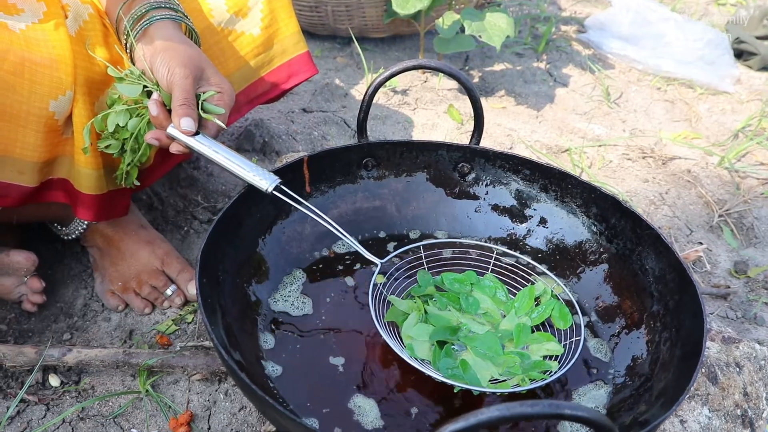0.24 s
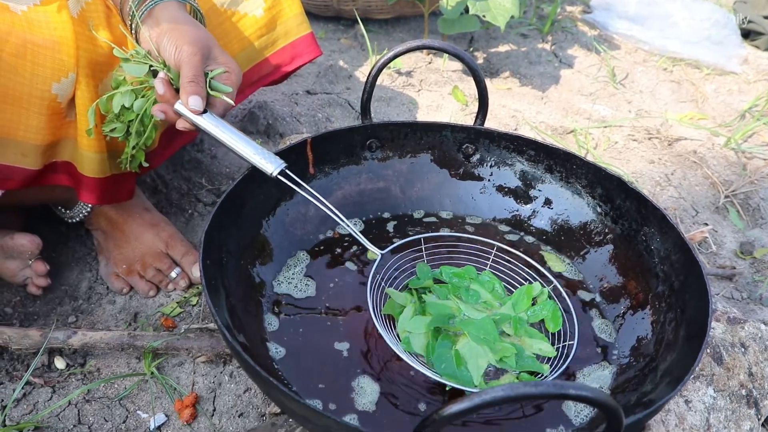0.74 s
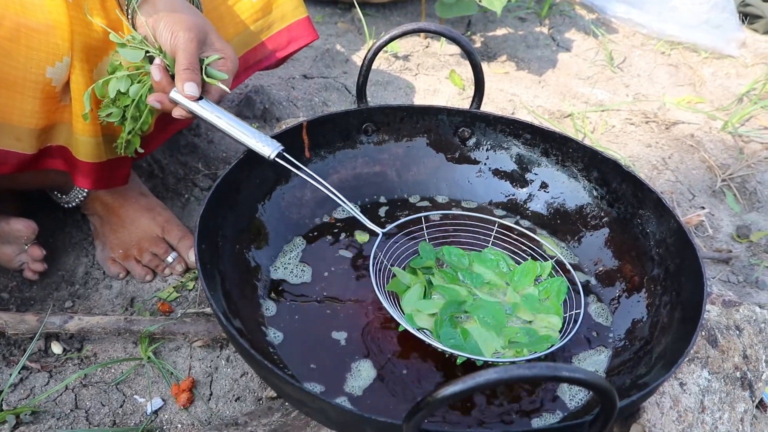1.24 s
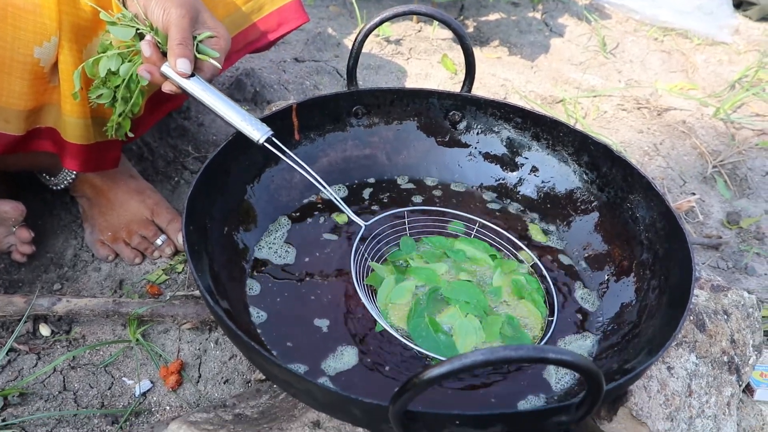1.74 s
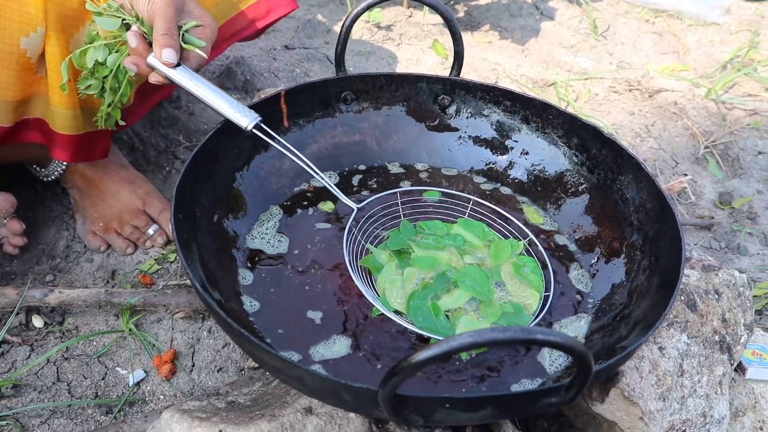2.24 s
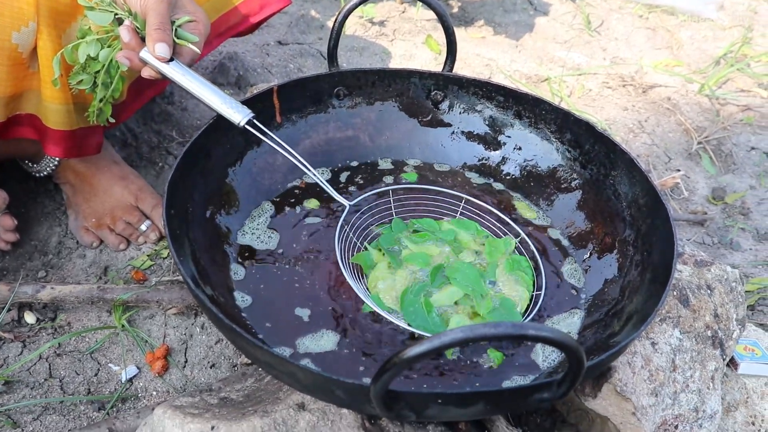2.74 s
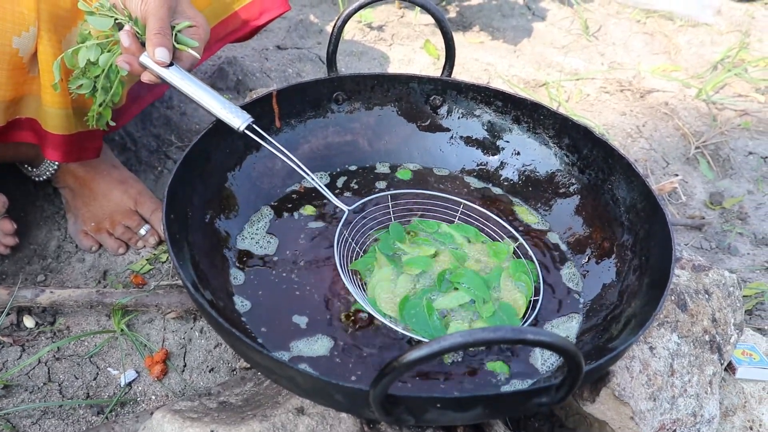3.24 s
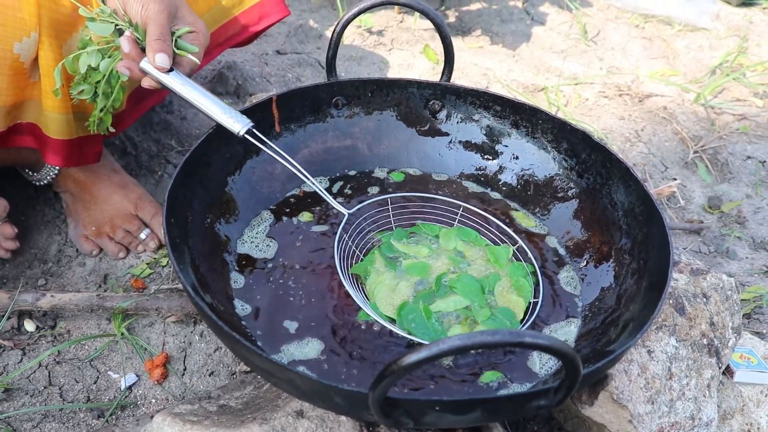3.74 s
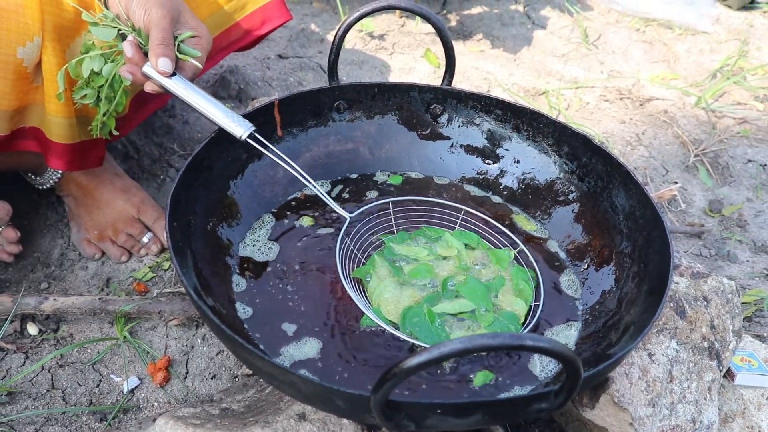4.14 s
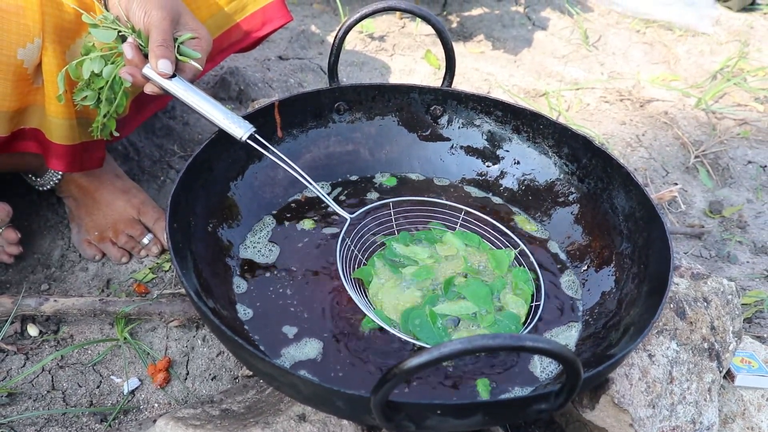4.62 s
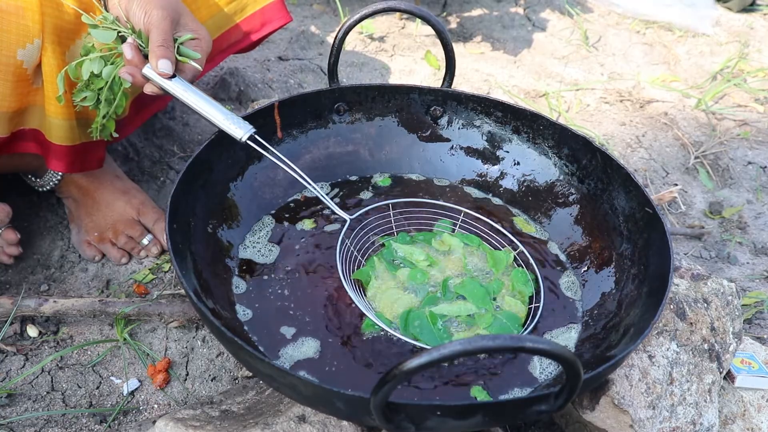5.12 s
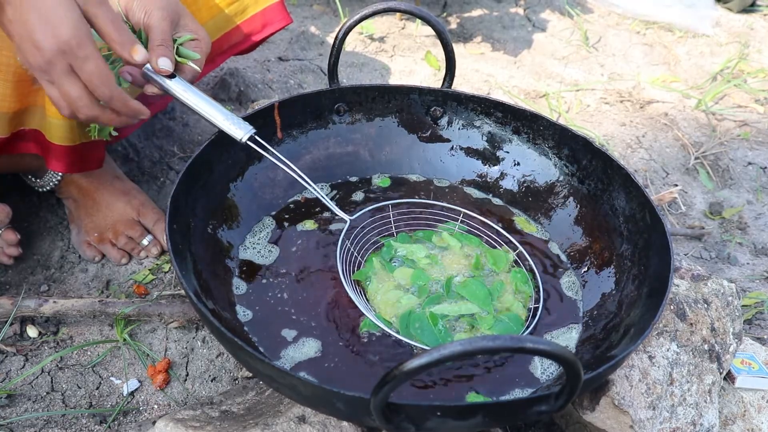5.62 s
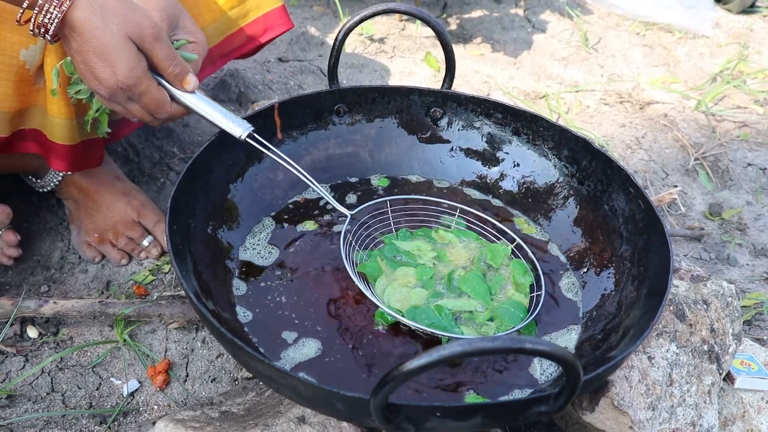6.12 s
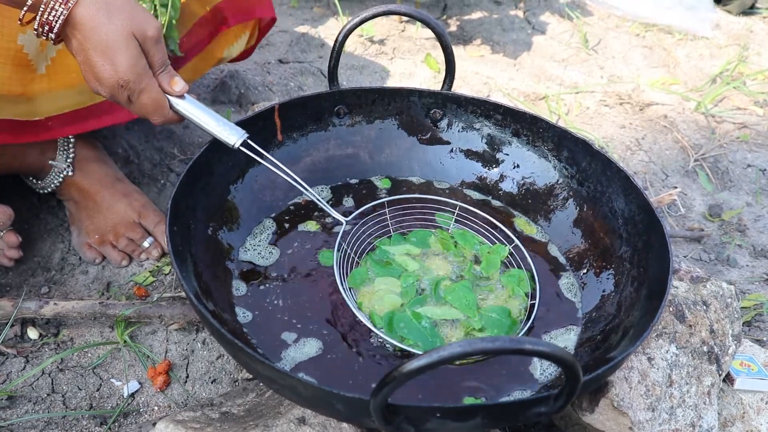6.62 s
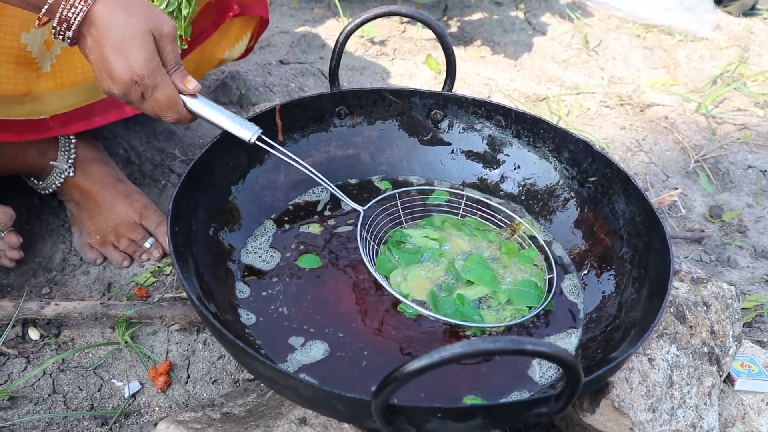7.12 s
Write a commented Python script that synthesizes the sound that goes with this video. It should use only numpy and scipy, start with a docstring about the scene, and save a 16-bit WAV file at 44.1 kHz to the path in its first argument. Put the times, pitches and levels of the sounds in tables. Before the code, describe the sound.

Fresh wet leaves fry in hot oil in a wide iron pan, close to a stereo microphone outdoors. Sharp, loud pops come scattered at first, then after about a second crowd into a dense crackle over a fine fizz, easing slightly later on. Cicadas hiss faintly in the distance above a low rumble, and a few soft wind puffs brush the right side early on.

```python
"""Wet leaves fry in hot oil in a wide iron pan, outdoors, close to a stereo pair of microphones.
Steam pockets burst one by one, echo off the pan wall and ring the air in its bowl, over a fine fizz.
Cicadas hiss in the distance; wind brushes mostly the right microphone, above a low outdoor rumble.
A limiter ducks everything after each loud pop."""
import sys
import numpy as np
from scipy import signal
from scipy.fft import rfft, irfft
from scipy.io import wavfile
from scipy.ndimage import uniform_filter1d, minimum_filter1d

SR = 44100
rng = np.random.default_rng(int(sys.argv[2]) if len(sys.argv) > 2 else 0)


def wrap_up_sound(samples):
    """Save the sound to the file named by the first command line argument, as 16-bit audio."""
    columns = np.atleast_2d(samples).T
    # keep every value between -1 and 1, then stretch to whole-number steps
    tamed = np.clip(columns, -1, 1)
    steps = np.round(tamed * 32767).astype(np.int16)
    wavfile.write(sys.argv[1], SR, steps)


N = 325017
TIME_S = np.arange(N) / SR

# Loud pops, close up. Each row: start in seconds, peak in dB before the limiter, nominal pitch in Hz.
POPS = [(0.03, 10, 3200), (0.046, -14.5, 1930), (0.0645, 15.5, 1930), (0.1956, -2, 3750), (0.269, 13, 2630),
        (0.2893, 8, 3130), (0.442, -13, 3200), (0.4856, 6.5, 3740), (0.5278, 12.5, 2150),
        (0.7645, 10.5, 2200), (0.7948, -9, 1820), (0.948, 19.5, 2880), (0.9525, 16, 2050),
        (0.9583, 18.5, 2080), (0.9916, 11.5, 2550), (1.0207, 10.5, 2153), (1.1048, 9.5, 1656),
        (1.127, 12.5, 2760), (1.1507, 14.5, 1730), (1.1621, 9.5, 2220), (1.196, 13.5, 2370),
        (1.2723, 9, 3300), (1.283, -1, 3180), (1.2897, 17, 2780), (1.4008, 8.5, 1565), (1.4142, 8, 2620),
        (1.4278, 18, 1830), (1.4565, 8.5, 2030), (1.4747, 11.5, 1070), (1.5231, 17, 3800),
        (1.5408, 19.5, 2100), (1.5797, 12, 1650), (1.5996, 15.5, 2410), (1.6358, 6, 3620),
        (1.643, 10.5, 1900), (1.6564, 16.5, 1320), (1.6632, 11, 1540), (1.7257, 18.5, 2730),
        (1.7521, 13.5, 1660), (1.8051, 11, 2530), (1.8452, 6, 1570), (1.8554, 10, 2440),
        (1.8649, 14.5, 2870), (1.8773, 12.5, 3120), (1.914, 6, 1160), (1.932, 1, 2480),
        (1.9388, 17.5, 2490), (1.9759, 26, 1600), (1.978, 17.5, 2200), (2.0021, 19.5, 2270),
        (2.007, 16, 3940), (2.0736, 20.5, 2600), (2.083, 16, 3320), (2.098, 16.5, 2440), (2.1367, 15, 2010),
        (2.1555, 10, 2680), (2.1645, 8.5, 3060), (2.1966, 25, 3040), (2.2385, 19, 3020), (2.2451, 14, 1550),
        (2.259, 13, 3080), (2.2837, 7, 2880), (2.2862, 19.5, 2530), (2.3387, 15.5, 2610), (2.357, 10, 3500),
        (2.3656, 8, 2880), (2.372, 23.5, 3120), (2.4056, 21.5, 3900), (2.458, 18.5, 2890),
        (2.481, 12, 1930), (2.5254, 9, 3300), (2.554, 14, 3130), (2.5706, 14.5, 3250), (2.5792, 10, 2220),
        (2.6181, 16, 3230), (2.6389, 8.5, 3480), (2.6567, 27.5, 2430), (2.691, 19, 2990),
        (2.7054, 10, 2500), (2.7506, 18.5, 2570), (2.7561, 14, 3260), (2.7732, 14, 2050), (2.7841, 9, 2600),
        (2.8017, 22, 3170), (2.83, 16.5, 2870), (2.8922, 22.5, 2680), (2.9187, 10, 2470), (2.9744, 3, 2530),
        (3.0188, 7, 2004), (3.0232, 3, 2770), (3.0443, 10, 2500), (3.0604, 16, 2200), (3.0776, 14, 3080),
        (3.0926, 18.5, 2120), (3.1665, 10, 2690), (3.1734, 19, 2980), (3.1951, 17.5, 3070),
        (3.2722, 18, 2100), (3.2781, 11, 1450), (3.2837, 16, 3380), (3.3028, 11, 2500),
        (3.3235, 20.5, 2350), (3.3278, 19, 2840), (3.3337, 3, 2780), (3.3659, 21, 2060), (3.3791, 16, 3120),
        (3.4162, 8, 2500), (3.4298, 19, 2140), (3.4446, 12.5, 2030), (3.5181, 7, 3070), (3.5239, 8, 2300),
        (3.5347, 15, 3140), (3.5412, 14, 2580), (3.572, 19, 2500), (3.5864, 17, 3250), (3.6362, 23, 2480),
        (3.6923, 12.5, 1900), (3.6961, 10, 4200), (3.7171, 10.5, 2110), (3.7384, 12.5, 3320),
        (3.76, 15, 2220), (3.7884, 10.5, 2100), (3.8175, 18.5, 2770), (3.842, 14.5, 3500),
        (3.872, 9.5, 2520), (3.901, 21.5, 3140), (3.9131, 14, 2720), (3.922, 12.5, 2700),
        (4.0226, 14.2, 2610), (4.0249, 17, 2470), (4.0497, 16, 2520), (4.067, 13.5, 2940),
        (4.091, 15.5, 2970), (4.1237, 5, 2800), (4.1415, 13, 2160), (4.172, 4.5, 3400), (4.1962, 4.5, 2780),
        (4.2668, 0.5, 3040), (4.2996, 5, 2850), (4.3079, 12, 2510), (4.3314, 6, 2200), (4.353, 15, 2970),
        (4.3632, 13.5, 1700), (4.4029, 15.5, 3650), (4.412, 8.5, 3080), (4.508, 14.5, 2770),
        (4.5227, 11.5, 2260), (4.542, 4.5, 3900), (4.5814, 13, 3510), (4.6116, -1, 3520), (4.6239, 7, 3080),
        (4.6376, 1.5, 3060), (4.6446, 18.5, 2820), (4.6611, 12.5, 3230), (4.7189, 18.5, 2280),
        (4.7451, 11.5, 3000), (4.8022, 12, 2750), (4.81, 20.5, 3470), (4.8233, 19, 4100),
        (4.898, 13.5, 3500), (4.928, 7, 1610), (4.967, 8, 2730), (4.9755, 15, 1970), (5.0758, 11, 1760),
        (5.1999, 7, 1830), (5.2668, 0.5, 2880), (5.298, 5, 3160), (5.3112, 9.5, 1500), (5.312, 14, 1900),
        (5.3687, 15, 2560), (5.3915, 10.8, 1710), (5.431, 5, 2960), (5.46, 7, 2570), (5.4776, 10, 2050),
        (5.5417, 16, 2870), (5.5651, 9.5, 2100), (5.5754, 7, 3650), (5.6323, 11, 3020), (5.6506, 1.5, 2600),
        (5.675, 15, 3300), (5.6954, 6.5, 3100), (5.7379, 17, 2080), (5.7761, 6.5, 1540), (5.7843, 12, 2620),
        (5.8074, 8.5, 3000), (5.837, 2.5, 3030), (5.8857, 8.5, 3470), (5.9277, 2, 1660), (5.9444, 8, 3200),
        (6.015, 4, 3760), (6.0256, 18.5, 3030), (6.0368, 13.5, 3100), (6.0723, 10, 1820),
        (6.1189, 4.5, 2730), (6.1341, 13, 3020), (6.16, 8.5, 3460), (6.2492, 6.5, 3860), (6.2904, 10, 2680),
        (6.3119, 16.5, 3860), (6.3441, 15, 2660), (6.4811, 8.5, 2580), (6.485, 5.5, 1870),
        (6.5079, 11.5, 2800), (6.551, 2, 1200), (6.588, 10.5, 3250), (6.6534, 7.5, 2950),
        (6.6922, 10.5, 3750), (6.7333, 7.5, 2320), (6.76, 6.5, 1550), (6.7626, 3.5, 2360),
        (6.7846, 6.5, 1540), (6.806, 9, 3540), (6.8352, 2, 2700), (6.8649, 12.5, 2900), (6.937, 9, 1730),
        (6.9433, 14, 3040), (6.972, 15, 2010), (6.976, 8, 3070), (6.994, 9, 1620), (7.0357, 9, 3900),
        (7.1064, 11, 2900), (7.14, 16.5, 1700), (7.145, 16, 3200), (7.1847, 10, 1544), (7.23, 1, 1010),
        (7.2747, 2, 1900), (7.2952, 4, 3170), (7.2976, 15.5, 2450), (7.3518, 20, 1890), (7.3655, 12, 2780),
        (7.3686, 15.5, 2500)]
def pops():
    """Big steam pockets burst, pitched by their size; some throw droplets that burst again just after."""
    start_s, peak_db, hz = np.transpose(POPS)
    count = len(start_s)
    throws = rng.random(count) < 0.4
    droplet_s = np.minimum(start_s + 0.001184 + 0.0041 * rng.random(count), N / SR - .001)
    droplet_db = peak_db - rng.uniform(2, 10, count)
    droplet_hz = hz * rng.uniform(0.67, 2.37, count)
    droplets = steam_bursts(droplet_s[throws], droplet_db[throws], droplet_hz[throws], tear_db=18)
    return steam_bursts(start_s, peak_db, hz, tear_db=24.2) + droplets


# Sputter in the same pan. Each row: time in seconds, base rate in bursts per second, highest peak in dB.
SPUTTER = [(0, 55, -11), (.9, 55, -16.5), (1.1, 60, -4.5), (1.9, 217, 6), (4.6, 200, 1.5), (5.2, 130, -3.5)]
def sputter(candidates=2100, stray_share=0.5, stir_s=.025, lull_s=0.013):
    """Small pockets burst at random, crowd in after each loud pop and pause just before one."""
    times, rates, tops_db = np.transpose(SPUTTER)
    start_s = rng.uniform(0, N / SR, candidates)
    after_pop_s = start_s[:, None] - np.transpose(POPS)[0]
    since_last_s = np.where(after_pop_s > 0, after_pop_s, np.inf).min(1)
    rate = np.interp(start_s, times, rates) * (stray_share + np.exp(-since_last_s / stir_s))
    in_lull = ((after_pop_s < 0) & (after_pop_s > -lull_s)).any(1)
    start_s = start_s[(rng.random(candidates) < rate * N / SR / candidates) & ~in_lull]
    peak_db = np.interp(start_s, times, tops_db) - 24 * rng.random(len(start_s)) ** 1.94
    hz = 2000 * 2.67 ** rng.random(len(start_s))
    return steam_bursts(start_s, peak_db, hz, tear_db=8.1)


# Colour of a burst leaving the bowl of the pan. Each row: frequency in Hz, relative gain in dB.
PAN_COLOUR = [(100, -23), (380, -9), (500, -2), (760, 0), (1100, -4.5), (1440, 2), (2290, 0.5), (3250, 3),
              (5450, 1.5), (8330, 10.5), (11600, 2.5), (14000, 3), (16500, 5)]
# The pan across the two microphones. Each row: frequency in Hz, left minus right in dB.
PAN_BALANCE = [(300, 1.5), (700, 1.5), (1300, 2.5), (2400, -3.5), (4400, -0.5), (15000, 1.5)]
def steam_bursts(start_s, peak_db, hz, tear_db, size=1024):
    """Each pocket pushes, snaps back and wobbles once or twice; the pan echoes and colours it."""
    count = len(start_s)
    freqs, two_sided_hz = np.fft.rfftfreq(size, 1 / SR), abs(np.fft.fftfreq(size, 1 / SR))
    pitch = hz[:, None]
    cycles = np.arange(size) / SR * pitch * 1.019
    wobble = np.sin(2 * np.pi * cycles) * cycles * np.exp(-cycles / 0.29)
    # the film tears at the end of the push: a step, sharper for small pockets
    tear_gain = (pitch / 3000) ** 2.2 * gain_of(tear_db - 32 * rng.random((count, 1)) ** 0.52)
    tear = (cycles < .45) * cycles * tear_gain
    source = rfft(0.43 * wobble / wobble.max(1, keepdims=True) + tear) * bowl_ring(freqs, pitch)
    pair = []
    for side, echoes in zip((.5, -.5), wall_echoes(freqs, count)):
        arrival = delayed(freqs, .00004 * rng.random((count, 1)))
        colour_db = db_at(PAN_COLOUR, two_sided_hz) + side * db_at(PAN_BALANCE, two_sided_hz)
        pair.append(irfft(source * (1 + echoes) * arrival * rfft(sharp_impulse(colour_db))))
    pair = np.array(pair)[:, :, :size // 2]
    pair *= (gain_of(peak_db) / abs(pair).max((0, 2)))[:, None]
    samples = np.round(start_s * SR).astype(int)[:, None] + np.arange(size // 2)
    out = np.zeros((2, N + size))
    for channel, bursts in zip(out, pair):
        np.add.at(channel, samples, bursts)
    return out[:, :N]


def bowl_ring(freqs, pitch, ring_hz=1440, width_hz=100, reach_hz=130):
    """The air in the bowl of the pan rings, most for pockets near its own pitch."""
    lift = 3 * np.exp(-((pitch - ring_hz) / reach_hz) ** 2)
    return 1 + lift / (1 + 1j * (freqs - ring_hz) / width_hz)


def wall_echoes(freqs, count, dull_hz=6650):
    """The curved, oily wall returns dulled echoes: one shared, eight timed apart at each microphone."""
    shared = 0.21 * delayed(freqs, 0.000549 + 0.00043 * rng.random((count, 1)))
    path_s = 0.00032 + 0.003466 * rng.random((count, 8, 1)) ** 1.356
    polarity = rng.choice([-1, 1], path_s.shape)
    for _ in range(2):
        delay_s = path_s + 0.00013 * rng.random(path_s.shape)
        scattered = (.5 * polarity * np.exp(-delay_s / 0.0019) * delayed(freqs, delay_s)).sum(1)
        yield (shared + scattered) / (1 + 1j * freqs / dull_hz)


# Close fizz and the open air around it. Each row: frequency in Hz, relative density in dB.
FIZZ_SPECTRUM = [(200, -60), (500, -24), (2280, -17.5), (3240, -16.5), (3970, -21.5), (7260, -23.5),
                 (9330, -28.5), (14400, -34.5), (16500, -61)]
def oil_fizz(level_db=-29):
    """The oil's fine fizz blends with the outdoor air and thickens with the sputter."""
    times, rates, _ = np.transpose(SPUTTER)
    level = gain_of(level_db) * np.interp(TIME_S, times, rates / rates.max()) ** 0.33
    return level * stereo_noise(FIZZ_SPECTRUM, coherence=0.64, patchy_db=2.8, flicker_db=2.8, size=256)


# Cicadas, heard from a distance. Each row: frequency in Hz, relative density in dB.
CICADA_SPECTRUM = [(4000, -46), (4400, -10), (4850, 0), (5300, -3.5), (6140, -6), (6600, -12), (7300, -27)]
# Their level at the microphones. Each row: time in seconds, level in dB.
CICADA_LEVELS = [(0.2, -29), (.5, -27), (2, -30), (7.4, -28.5)]
def cicadas():
    """A far chorus merges into one wide hiss that swells and sinks."""
    hiss = stereo_noise(CICADA_SPECTRUM, coherence=0.033, patchy_db=0.92, flicker_db=1, size=512)
    return envelope(CICADA_LEVELS) * hiss


# Turbulence right at the microphones. Each row: frequency in Hz, relative density in dB.
WIND_SPECTRUM = [(25, -45), (76, 1.5), (120, 1), (263, -7.5), (430, -24), (600, -54), (1320, -120)]
# Gusts, mostly on the right microphone. Each row: time of the peak in seconds, relative level in dB.
GUSTS = [(0.388, -12.5), (.47, -32), (.51, -13), (.553, -4.5), (0.753, -5), (0.841, -7), (0.94, -17),
         (1.522, -13.5), (1.71, -18), (4.29, -26), (6.46, -26)]
def wind(breeze_db=-42, rise_db_per_s=307, fall_db_per_s=249, thump_hz=95, thump_s=0.0083):
    """Short puffs of low turbulence ride a weak breeze; each peaks in one push on the capsule."""
    level, thumps = gain_of(breeze_db), 0
    for peak_s, db in GUSTS:
        t = TIME_S - peak_s
        level = level + gain_of(db - np.maximum(-rise_db_per_s * t, fall_db_per_s * t))
        push = np.sin(2 * np.pi * (thump_hz * TIME_S + rng.random()))
        thumps = thumps + gain_of(db) * np.exp(-(t / thump_s) ** 2) * push
    turbulence = stereo_noise(WIND_SPECTRUM, coherence=0, patchy_db=1, flicker_db=4, size=512)
    puffs = np.tanh(2 * (0.89 * level * turbulence + 1.54 * thumps)) / 2  # the capsule overloads softly
    housing = signal.butter(2, 55, "high", fs=SR)
    return signal.lfilter(*housing, puffs) * gain_of([[-22], [0]])


# Outdoor background, all around. Each row: frequency in Hz, relative density in dB.
RUMBLE_SPECTRUM = [(25, -23), (81, 6.5), (102, 2.5), (156, -2), (254, -10.5), (400, -11.5), (520, -22.5),
                   (880, -120)]
# Its level at the microphones. Each row: time in seconds, level in dB.
RUMBLE_LEVELS = [(0, -31), (1.1, -33), (1.9, -35), (2.2, -39), (3, -33.5), (5.6, -36), (7.4, -29.5)]
def rumble():
    """A low rumble swells slowly, nearly alike in both microphones."""
    low = stereo_noise(RUMBLE_SPECTRUM, coherence=0.94, patchy_db=1, flicker_db=1, size=2048)
    return envelope(RUMBLE_LEVELS) * low


def stereo_noise(spectrum, coherence, patchy_db, flicker_db, size):
    """Shaped noise at rms 1, with drifting patches and a flicker shared by all pitches."""
    frames, hz = 4 * N // size + 5, np.fft.rfftfreq(size, 1 / SR)
    left_re, left_im, apart_re, apart_im, drift = rng.standard_normal((frames, len(hz), 5)).T
    flicker = unit_rms(uniform_filter1d(drift[0], size=3))
    patches = unit_rms(uniform_filter1d(uniform_filter1d(drift, size=8, axis=0), size=10, axis=1))
    left = left_re + 1j * left_im
    right = coherence * left + np.sqrt(1 - coherence ** 2) * (apart_re + 1j * apart_im)
    gain = gain_of(db_at(spectrum, hz)[:, None] + patchy_db * patches + flicker_db * flicker)
    _, sound = signal.istft(np.array([left, right]) * gain, nperseg=size, noverlap=3 * size // 4)
    return unit_rms(sound[:, :N])


def sharp_impulse(db):
    """Minimum-phase impulse response for a two-sided spectrum in dB."""
    log_gain = np.log(gain_of(db))
    return np.fft.ifft(np.exp(np.conj(signal.hilbert(log_gain)))).real


def delayed(freqs, delay_s):
    """Frequency response of a pure delay."""
    return np.exp(-2j * np.pi * freqs * delay_s)


def db_at(spectrum, hz):
    """Reads a spectrum on a log-frequency axis."""
    freqs, db = np.transpose(spectrum)
    return np.interp(np.log(hz + 1), np.log(freqs + 1), db)


def envelope(levels):
    """Gain at each sample, from rows of seconds and dB."""
    return gain_of(np.interp(TIME_S, *np.transpose(levels)))


def gain_of(db):
    """Decibels to a factor."""
    return 10 ** (np.asarray(db) / 20)


def unit_rms(x):
    """Scales to rms 1."""
    return x / np.sqrt(np.mean(x ** 2) + 1e-20)


def scene():
    """The pan close in front, cicadas far off, wind and rumble around the microphones."""
    return pops() + sputter() + oil_fizz() + cicadas() + wind() + rumble()


def record(dry, ceiling_db=.6, recovery_s=.09, band_limit_hz=16600):
    """A look-ahead limiter pulls the gain down at once and lets it creep back; a low-pass follows."""
    over_db = np.maximum(20 * np.log10(abs(dry).max(0) + 1e-9) - ceiling_db, 1e-3)
    over_db[0] = 15.0  # starts ducked
    held_db = -minimum_filter1d(-over_db, size=441, origin=180)  # looks 1 ms ahead, holds 9 ms
    release = TIME_S / recovery_s
    cut_db = np.exp(np.maximum.accumulate(np.log(held_db) + release) - release)
    limited = np.clip(dry / gain_of(uniform_filter1d(cut_db, size=40)), -1, 1)  # sharp peaks still clip
    low_pass = signal.firwin(511, band_limit_hz, window=("kaiser", 9), fs=SR)
    return signal.oaconvolve(limited, low_pass[None], "same")


dry = scene()
out = record(dry)
wrap_up_sound(out)
```